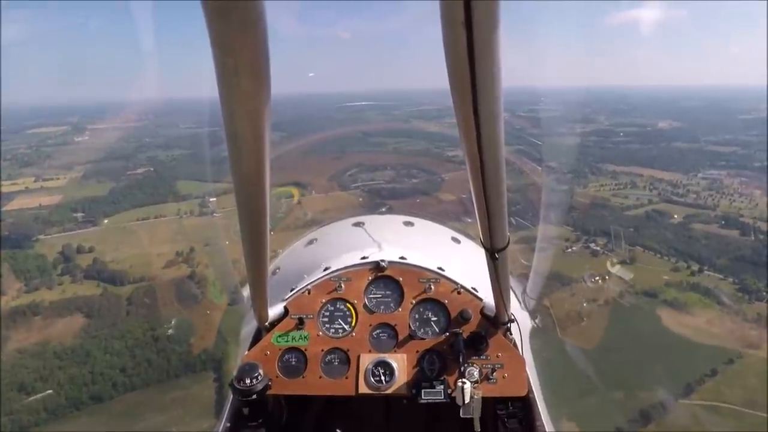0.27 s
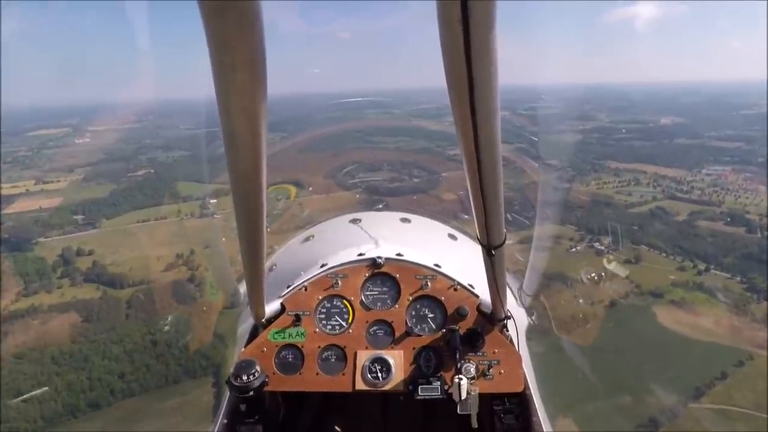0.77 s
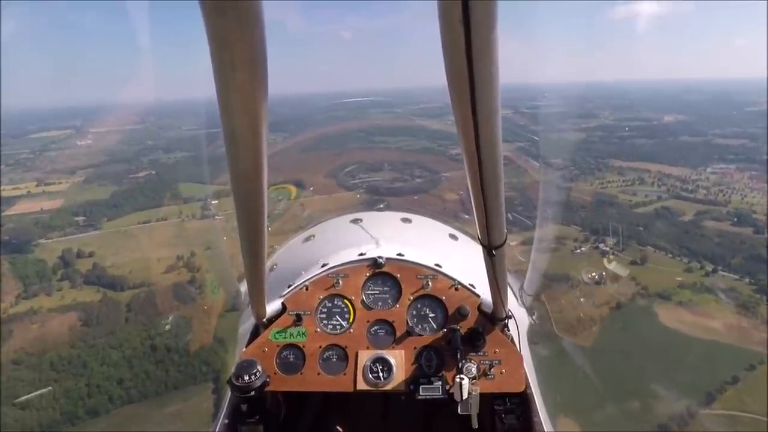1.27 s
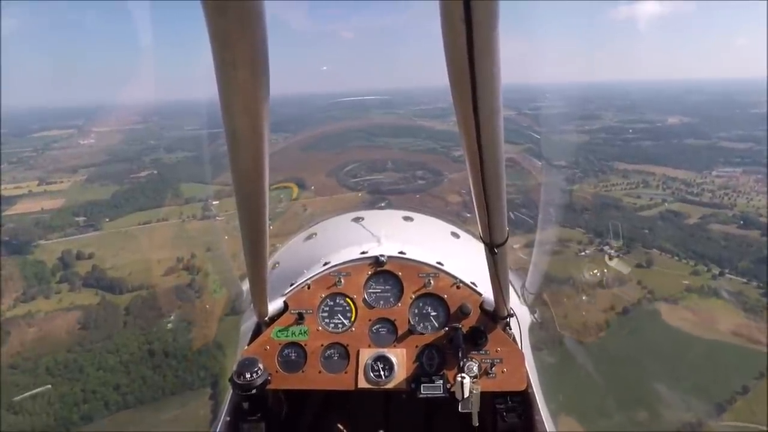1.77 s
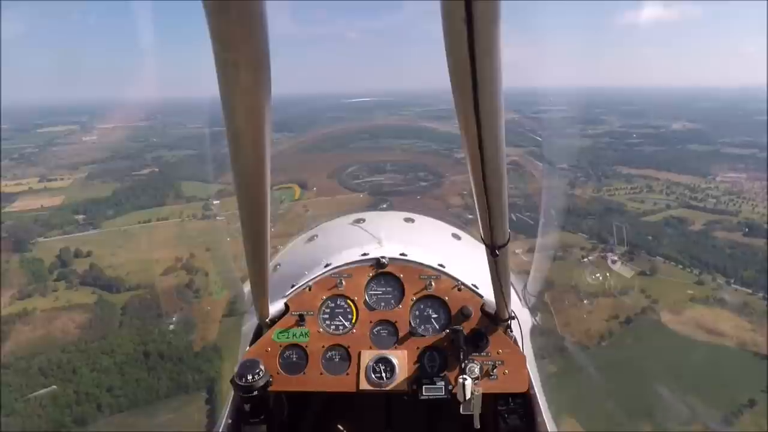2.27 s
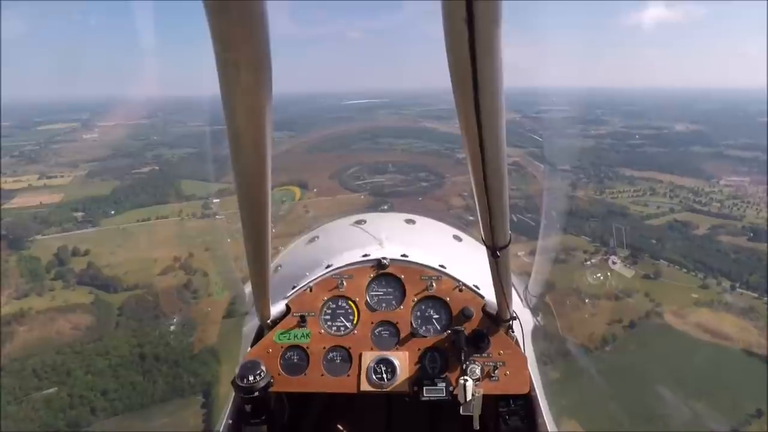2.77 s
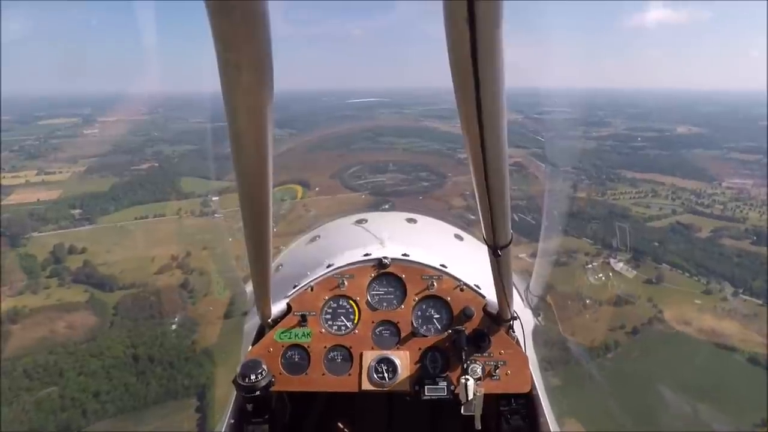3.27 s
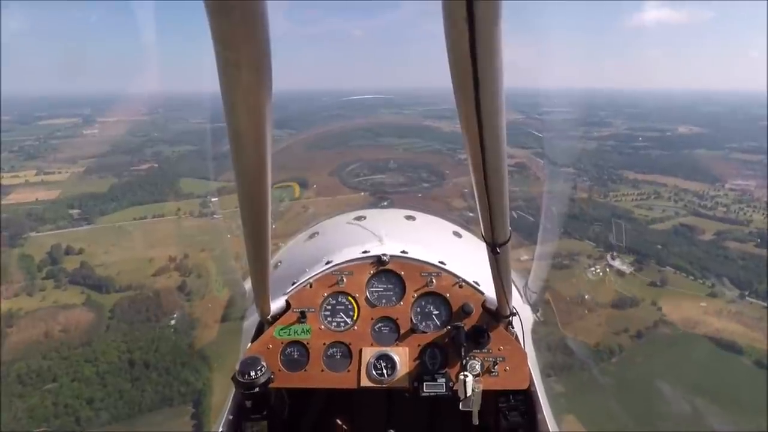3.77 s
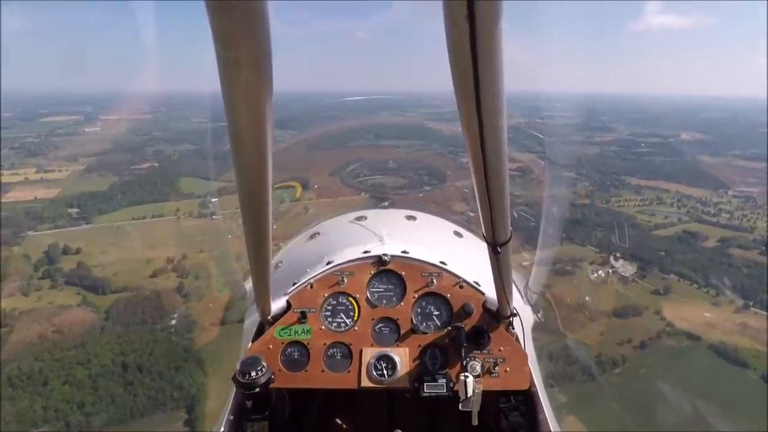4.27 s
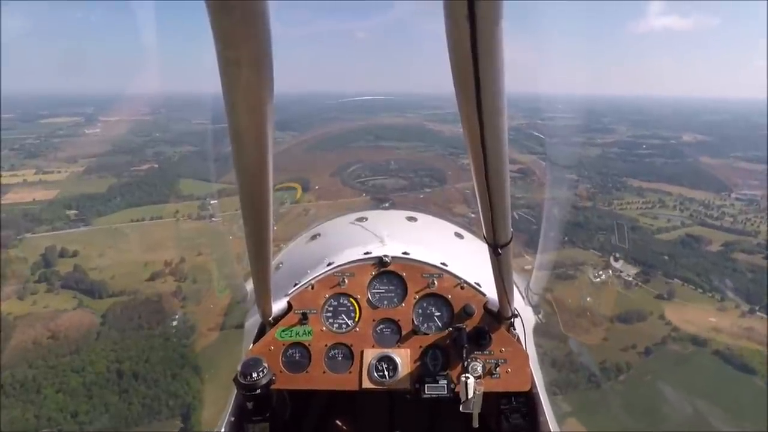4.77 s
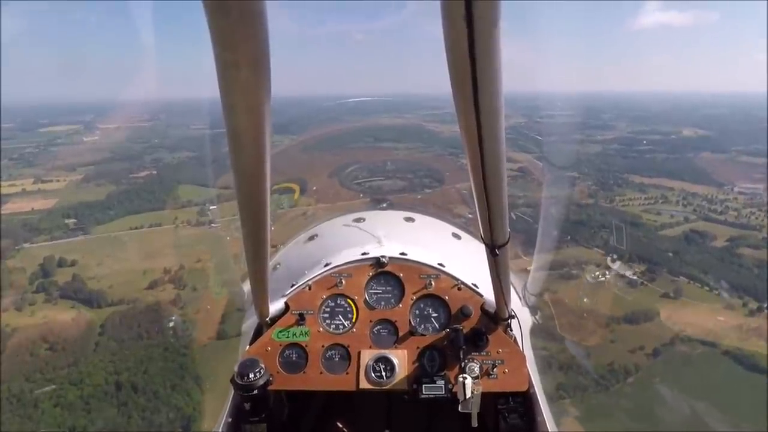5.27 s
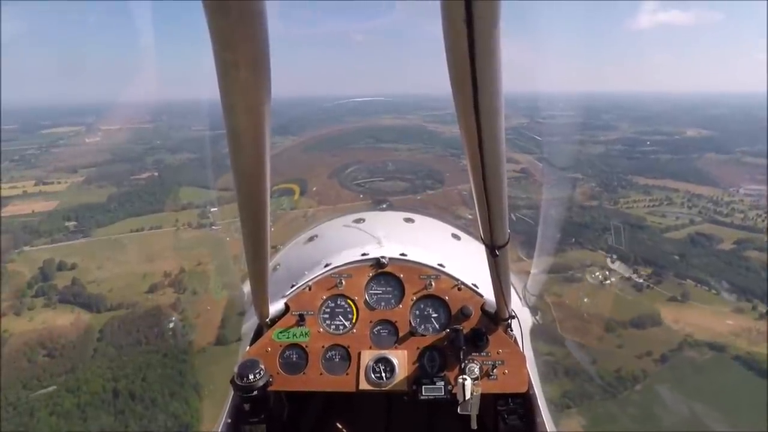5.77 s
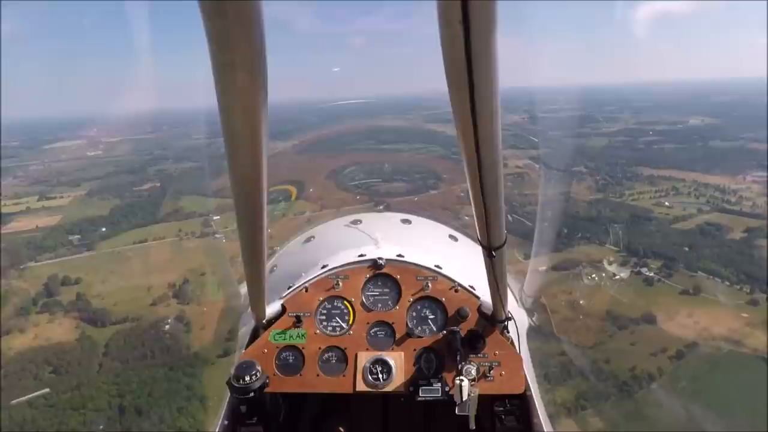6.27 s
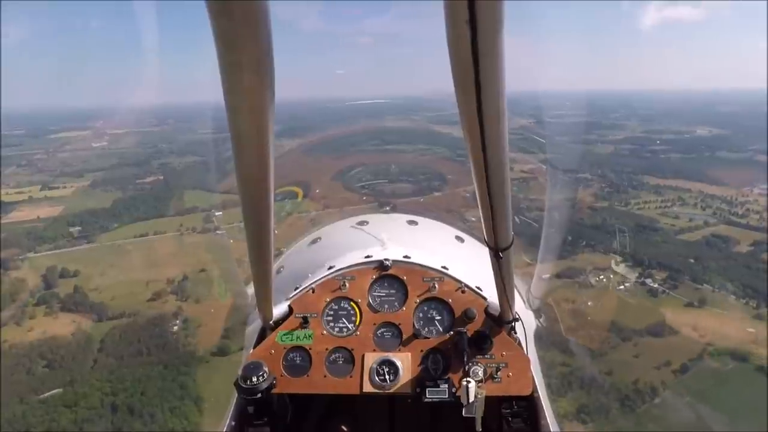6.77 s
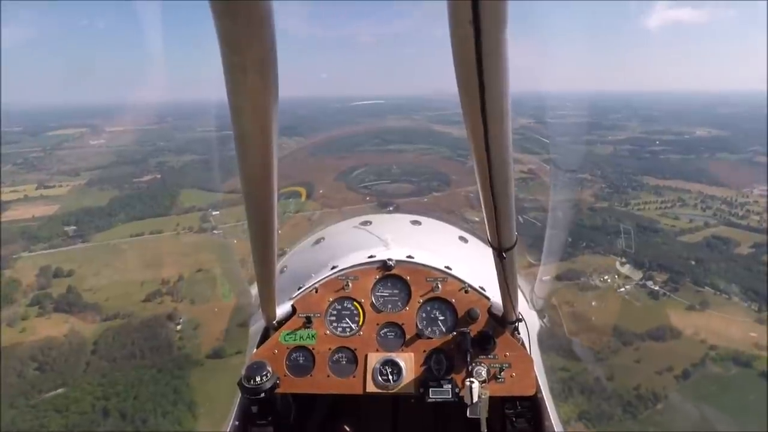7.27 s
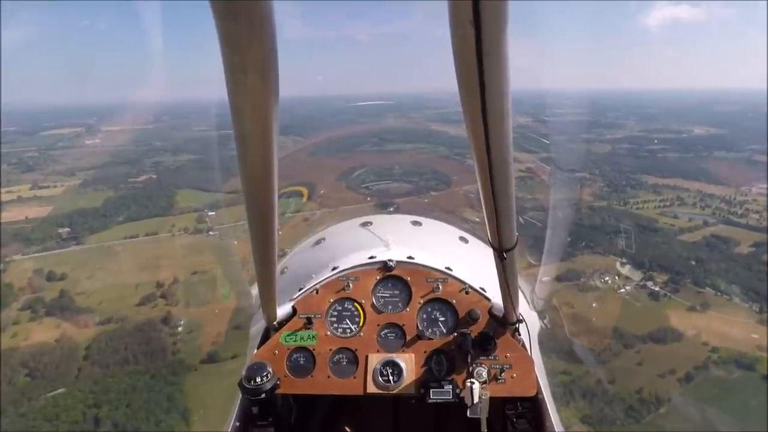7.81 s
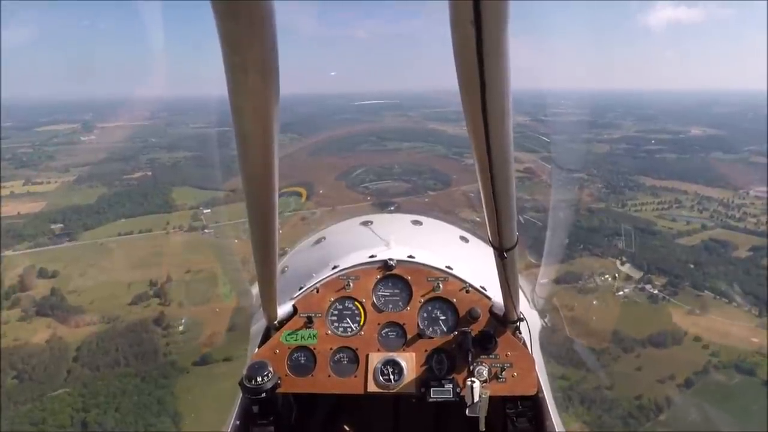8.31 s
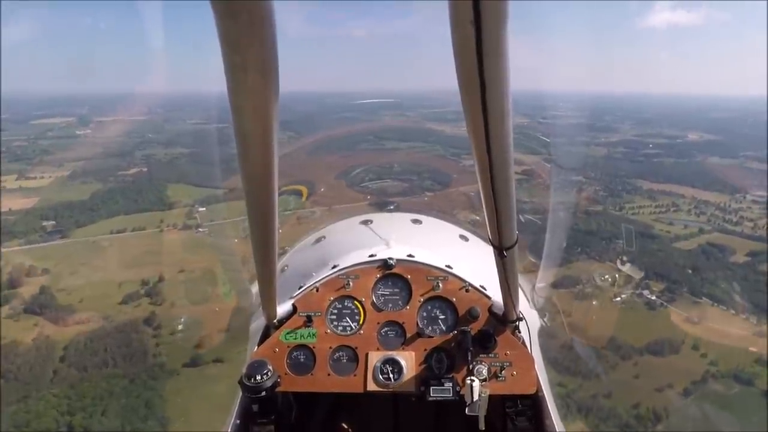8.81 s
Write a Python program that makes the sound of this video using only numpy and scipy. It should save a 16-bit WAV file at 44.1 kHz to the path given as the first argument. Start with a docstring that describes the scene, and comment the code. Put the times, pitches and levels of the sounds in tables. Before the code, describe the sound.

A steady mid-pitched electrical whine with faint whistling overtones and rapid soft ticking, left side only, over thin hiss in a small aircraft.

```python
"""Aircraft intercom with alternator whine

A small aircraft flies level; its intercom line is heard on the left channel only.
The alternator's rectifier ripple whines on the supply: harmonics of one shaft speed, as summed cosines.
The voltage regulator ticks every 24th ripple, slipping ahead at times: square spikes through a supply filter.
A headset microphone adds a thin trace of engine harmonics and slipstream noise; the open right input hisses."""
import sys
import numpy as np
from scipy import signal
from scipy.fft import rfft, irfft
from scipy.io import wavfile

SR = 44100
rng = np.random.default_rng(int(sys.argv[2]) if len(sys.argv) > 2 else 0)


def unload_audio(sound):
    """Save the sound as a 16-bit wav file, at the path given as the first command line argument."""
    columns = np.transpose(np.atleast_2d(sound))
    # keep every value between -1 and 1, then stretch to whole-number steps
    steps = np.round(np.clip(columns, -1, 1) * 32767)
    wavfile.write(sys.argv[1], SR, steps.astype(np.int16))


N = 399105
TIME = np.arange(N) / SR  # s
HZ = np.arange(N // 2 + 1) * SR / N


def from_db(db):
    """Logarithmic level: decibels become an amplitude factor."""
    return 10 ** (np.asarray(db) / 20)


def in_time(rows):
    """Linear interpolation: (time, value) rows become a curve with a value at every sample."""
    return np.interp(TIME, *np.transpose(rows))


def drift(rate_hz):
    """Band-limited fluctuation: random points, rate_hz per second, joined by lines and scaled to spread 1."""
    points = rng.standard_normal(4096)
    slow = np.interp(TIME * rate_hz, np.arange(len(points)), points)
    return slow / slow.std()


def noise(spectrum, resonances=()):
    """Spectral shaping: white noise is weighted to a density in dB per Hz and lifted at resonances."""
    hz, density_db = np.transpose(spectrum)
    level_db = np.interp(np.log(HZ + 1), np.log(hz), density_db)
    for centre_hz, width_hz, lift_db in resonances:
        level_db = level_db + lift_db / (1 + (2 * (HZ - centre_hz) / width_hz) ** 2)
    white = rfft(rng.standard_normal(N))
    return irfft(white * from_db(level_db) * np.sqrt(SR / 2), N)


def tone(cycles, rms_db):
    """Harmonic oscillation: a cosine of the given rms level that crests on whole cycles."""
    phase = (2 * np.pi * (cycles % 1)).astype(np.float32)
    return np.sqrt(2) * from_db(rms_db) * np.cos(phase)


# hiss spectrum of the open right input: pitch_hz [Hz], density_db [dB per Hz]
OPEN_INPUT_SPECTRUM = [(15, -88), (50, -98), (120, -100), (400, -104), (1000, -106.5), (2800, -109.5),
                       (5000, -113), (9300, -116), (10200, -114), (15000, -116)]


def open_input_hiss():
    """Electronic noise: an unconnected input carries only a shaped random signal."""
    return noise(OPEN_INPUT_SPECTRUM)


# hiss spectrum of the intercom electronics: pitch_hz [Hz], density_db [dB per Hz]
INTERCOM_SPECTRUM = [(15, -81), (65, -95.5), (250, -93), (1000, -101), (4000, -105), (9500, -109),
                     (12000, -114), (15000, -116)]


def intercom_hiss():
    """Electronic noise: the intercom line has its own shaped random signal."""
    return noise(INTERCOM_SPECTRUM)


# steady loudness of the cockpit at the microphone: start_s [s], level_db [dB about the mean]
COCKPIT_LEVEL = [(0, -.8), (.7, -3.2), (1.3, -1.8), (3.2, -1.8), (3.45, -3), (4.1, -1.7), (5.35, -1.3),
                 (5.87, -5), (6.3, -2.3), (7.3, -2), (7.75, .8), (9.05, .3)]
# gusts that brush the microphone: peak_s [s], lift_db [dB], half_length_s [s]
AIR_GUSTS = [(1.03, 2.5, .08), (2.97, 3.6, .07), (3.17, 3.2, .03), (4.55, 1.6, .06), (4.93, 1.6, .1),
             (6.395, 6.0, .032)]


def airflow_db(buffet_db=.9, buffets_hz=24):
    """Amplitude modulation by air: a steady level, bell-shaped gusts and random buffeting add in decibels."""
    gusts_db = sum(lift_db * np.exp(-((TIME - peak_s) / half_s) ** 2) for peak_s, lift_db, half_s in AIR_GUSTS)
    return in_time(COCKPIT_LEVEL) + gusts_db + buffet_db * drift(buffets_hz)


# engine drone before waver and airflow: multiple [of the firing rate], level_db [dB rms]
ENGINE_HARMONICS = [(1, -80), (2, -73.7), (11, -79), (13, -75), (14, -73), (15, -66), (16, -69),
                    (17, -61.8), (18, -70), (19, -74), (20, -66), (21, -66), (22, -69), (24, -70),
                    (25, -73), (27, -74), (28, -76), (29, -77)]
# slipstream spectrum before resonance and airflow: pitch_hz [Hz], density_db [dB per Hz]
SLIPSTREAM_SPECTRUM = [(200, -110), (500, -100), (850, -100), (1130, -86.6), (1600, -88.4), (1950, -87.6),
                       (2750, -89.8), (3300, -89.4), (4300, -93.3), (5800, -92.4), (6400, -96.3),
                       (8000, -103), (10500, -109), (12500, -120)]
# resonances of the headset microphone: pitch_hz [Hz], width_hz [Hz], lift_db [dB]
MICROPHONE_RESONANCES = [(630, 150, 7), (1180, 170, 2), (1500, 150, 5)]
RIPPLES_PER_FIRING = 7.8


def headset(ripples, waver_db=2.5, wobble_cycles=.0075):
    """Shared modulation: engine harmonics and resonant slipstream noise swell together with the airflow."""
    firings = ripples / RIPPLES_PER_FIRING + wobble_cycles * drift(14)
    drone = 0
    for order, level_db in ENGINE_HARMONICS:
        drone = drone + tone(order * firings + rng.random(), level_db + waver_db * drift(9))
    slipstream = noise(SLIPSTREAM_SPECTRUM, MICROPHONE_RESONANCES)
    return (drone + slipstream) * from_db(airflow_db())


# runs in which the regulator slips ahead, one ripple at a time: start_s [s], end_s [s], gained [ripples]
REGULATOR_SLIPS = [(.73, .73, 1), (1.41, 1.7, 4), (1.86, 2.05, 5), (6.54, 6.62, 2), (7.13, 7.21, 3),
                   (7.42, 7.42, 1)]
# hollows in the tick's tone: pitch_hz [Hz], q [ratio], share [fraction taken out]
THUMP_HOLLOWS = [(70, 3.0, .55), (900, 1.6, .12)]
RIPPLES_PER_TICK, FIRST_TICK = 24, 16.91  # both in ripples
SPIKE_S = .00039
FILTER_EDGE_HZ, FILTER_LAG_HZ, FILTER_DAMPING = 2500, 226, .64  # supply filter


def regulator(ripples, impulse_db=-5.15, spread_db=.4, coupling_hz=62):
    """Phase dispersion: the supply filter rounds square spikes and delays their lows into soft, hollow thumps."""
    slip_times = np.concatenate([np.linspace(*run) for run in REGULATOR_SLIPS])
    counter = ripples + np.searchsorted(slip_times, TIME) - FIRST_TICK
    tick_at = 1 + np.flatnonzero(np.diff(counter // RIPPLES_PER_TICK) > 0)
    impulses = np.zeros(N)
    impulses[tick_at] = from_db(impulse_db + spread_db * rng.standard_normal(len(tick_at)))
    # each impulse is spread evenly over the length of the spike
    width = round(SPIKE_S * SR)
    spikes = signal.lfilter(np.ones(width) / width, 1, impulses)
    # an all-pass changes only the phase; the tiny offset keeps its state above vanishing numbers
    w, loss = 2 * np.pi * FILTER_LAG_HZ, 2 * FILTER_DAMPING
    all_pass = signal.bilinear([1, -loss * w, w * w], [1, loss * w, w * w], SR)
    smeared = signal.lfilter(*all_pass, spikes + 1e-18)
    thump = signal.lfilter(*signal.butter(2, FILTER_EDGE_HZ, fs=SR), smeared)
    for pitch_hz, q, share in THUMP_HOLLOWS:
        thump = thump - share * signal.lfilter(*signal.iirpeak(pitch_hz, q, fs=SR), thump)
    return signal.lfilter(*signal.butter(1, coupling_hz, "high", fs=SR), thump)


# overtones that stand out as a whistle: start_s [s], end_s [s], multiple [of the stator cycle], lift_db [dB]
WHISTLE_SWELLS = [(.7, 1.3, 54, 5), (4.4, 5.25, 54, 10), (7.55, 9.2, 62, 10)]
SWELL_FADE_S = .2


def swell_db(order):
    """Amplitude envelope: the lift of one overtone fades in, holds and fades out."""
    lift = 0
    for start_s, end_s, which, lift_db in WHISTLE_SWELLS:
        if which == order:
            inside_s = np.minimum(TIME - start_s, end_s - TIME)
            lift = lift + lift_db * np.clip(inside_s / SWELL_FADE_S + .5, 0, 1)
    return lift


# harmonics of the ripple's cusps before unrest: multiple [of the ripple rate], level_db [dB rms]
RIPPLE_HARMONICS = [(1, -46.4), (2, -47), (3, -51)]
# ripple rates that count as slow, cruise and fast: pitch_hz [Hz]
PACE_RATES = (567, 568.6, 569.7)
# overtones of the six unequal diode pulses, before swells, waver and flutter:
# multiple [of the stator cycle of six ripples], slow_db, cruise_db, fast_db [dB rms at each pace]
DIODE_OVERTONES = [(13, -72, -69, -72), (15, -70, -68, -64), (16, -69, -71, -70), (17, -67, -70, -70),
                   (21, -68, -71, -69), (22, -74, -75, -75), (23, -68, -70, -69), (24, -61, -60.5, -63.5),
                   (26, -72, -70, -68), (27, -74, -76, -76), (30, -66, -68.5, -77), (31, -74, -75, -76),
                   (32, -73, -71, -71), (34, -63.5, -65, -64.5), (36, -62, -60, -60),
                   (42, -65.5, -62.5, -64.5), (48, -72, -76, -73), (54, -69, -73, -74),
                   (56, -71, -70.5, -70), (58, -69, -66, -69), (60, -66.5, -68.5, -75), (62, -71, -68, -71),
                   (63, -76, -77, -75), (64, -65, -66, -69), (66, -74.5, -78, -77), (70, -74, -75, -79),
                   (72, -74, -75, -75), (76, -79, -80, -79), (78, -76, -74, -75), (80, -80, -80, -78),
                   (90, -81, -80, -82), (96, -78, -77, -77), (114, -79.5, -79, -81), (120, -83.5, -84, -86),
                   (132, -83, -82, -83), (138, -85, -85, -86), (150, -85.5, -85.5, -87),
                   (156, -87, -87.5, -87.5)]
DIODES = 6
SWITCH_LEAD = .25  # share of a ripple by which the diode's spike leads the dip


def alternator(ripples, speed_hz, jitter_ripples=.0028, unrest_db=.24, stagger_cycles=.1, waver_db=1.7,
               flutter_db=.9, faint_db=-77, faint_fall_db=.26):
    """Rectification: the supply dips in a cusp at each diode change; unequal diodes add a comb of whistles."""
    # crests are inverted into dips
    cusps = -sum(tone(order * ripples, level_db) for order, level_db in RIPPLE_HARMONICS)
    hum = cusps * from_db(unrest_db * drift(28))
    # the diodes switch a little unevenly, which blurs the highest whistles
    stator = (ripples + jitter_ripples * drift(150)) / DIODES
    comb = 0
    for order, *pace_levels_db in DIODE_OVERTONES:
        if order % DIODES:
            offset = rng.random()
        else:
            # multiples of the ripple rate crest nearly together: a small switching spike ahead of each dip
            offset = order / DIODES * SWITCH_LEAD + stagger_cycles * rng.standard_normal()
        level_db = np.interp(speed_hz, PACE_RATES, pace_levels_db) + swell_db(order) + waver_db * drift(12)
        comb = comb + tone(order * stator + offset, level_db)
    # the other even overtones are faint and weaken with height
    others = np.setdiff1d(np.arange(44, 112, 2), [row[0] for row in DIODE_OVERTONES])
    faint = 0
    for order in others:
        level_db = faint_db - faint_fall_db * (order - others[0])
        faint = faint + tone(order * stator + rng.random(), level_db)
    return hum + (comb + faint) * from_db(flutter_db * drift(18))


# alternator speed: start_s [s], pitch_hz [rectifier ripples per s]
ALTERNATOR_SPEED = [(0.0, 565.28), (0.35, 562.87), (0.78, 565.68), (1.06, 565.38), (1.31, 567.38),
                    (2.01, 566.89), (2.19, 569.39), (3.85, 567.61), (4.58, 570.95), (4.72, 569.22),
                    (5.14, 570.97), (5.36, 568.93), (5.97, 569.05), (6.37, 567.95), (7.45, 567.38),
                    (7.65, 568.89), (8.36, 569.98), (9.05, 569.52)]


def scene():
    """Common drive: one shaft speed sets whine, ticks and drone on the left; the right input is open."""
    speed_hz = in_time(ALTERNATOR_SPEED)
    ripples = np.cumsum(speed_hz) / SR  # ripples counted so far
    intercom = intercom_hiss() + headset(ripples) + regulator(ripples) + alternator(ripples, speed_hz)
    return np.array([intercom, open_input_hiss()])


def record(dry, cutoff_hz=15100):
    """Band limitation: a steep elliptic low-pass cuts the top of both channels."""
    low_pass = signal.ellip(12, .1, 80, cutoff_hz, fs=SR, output="sos")
    return signal.sosfilt(low_pass, dry)


dry = scene()
out = record(dry)
unload_audio(out)
```